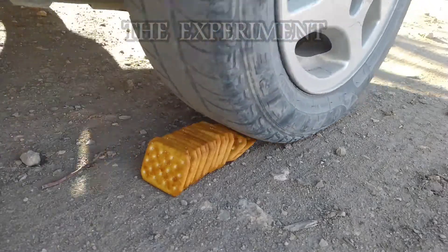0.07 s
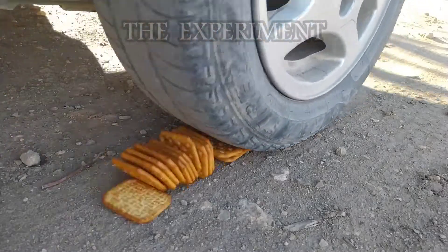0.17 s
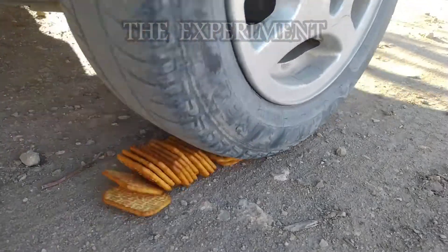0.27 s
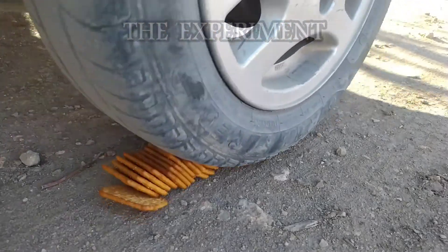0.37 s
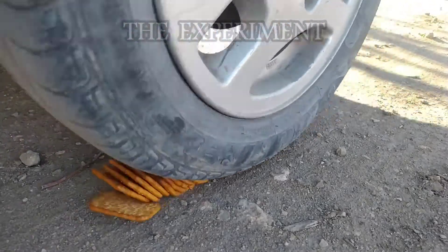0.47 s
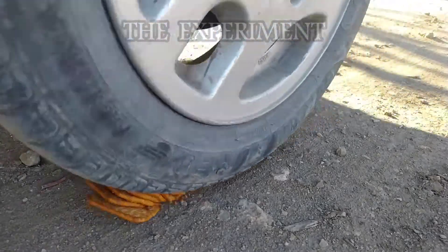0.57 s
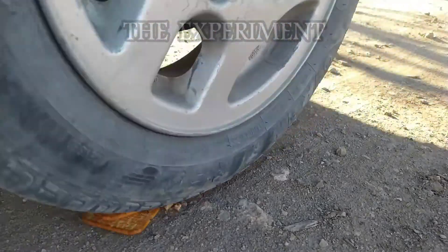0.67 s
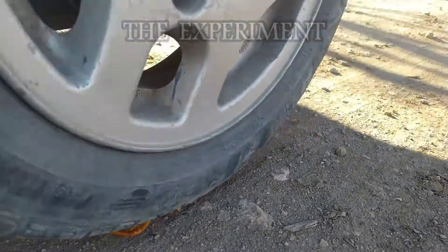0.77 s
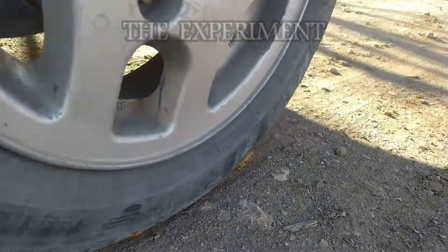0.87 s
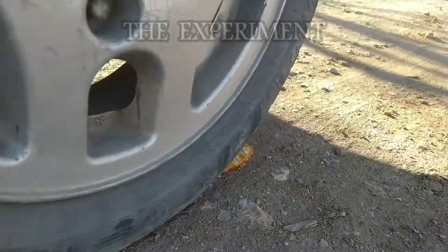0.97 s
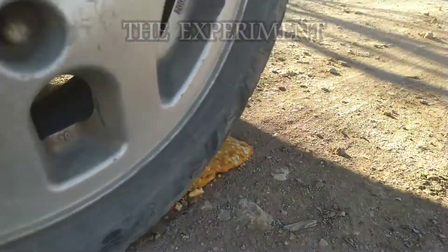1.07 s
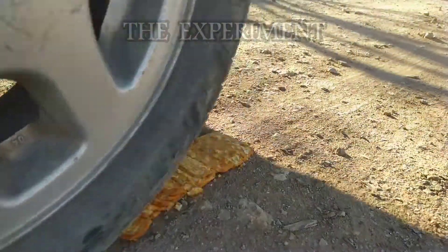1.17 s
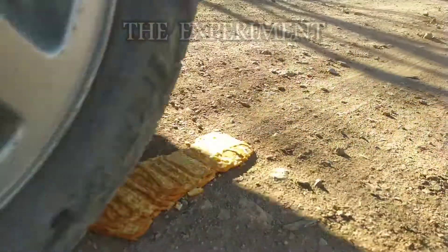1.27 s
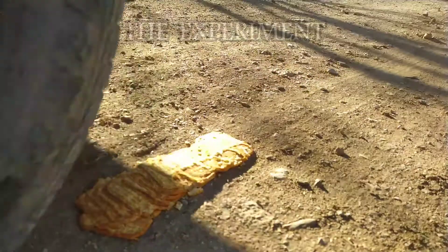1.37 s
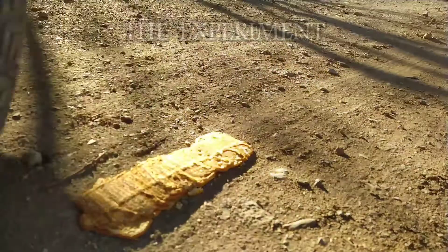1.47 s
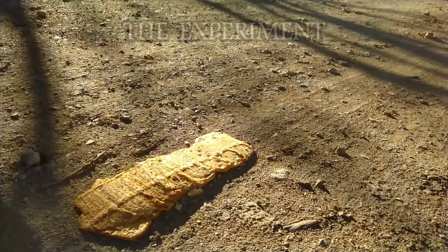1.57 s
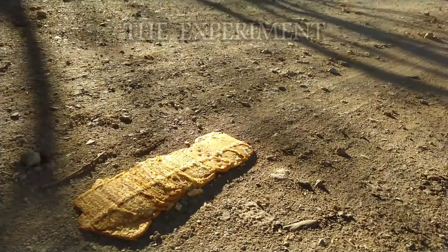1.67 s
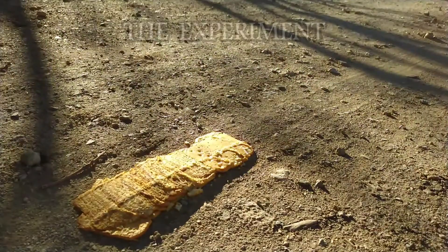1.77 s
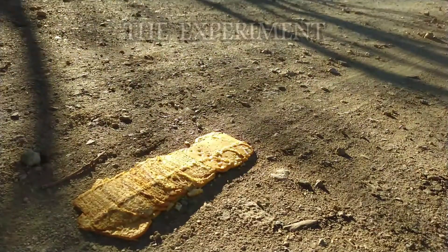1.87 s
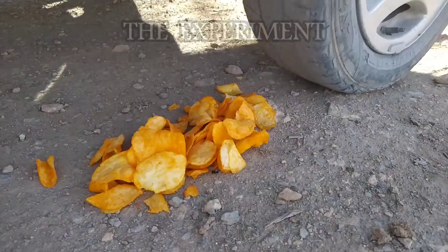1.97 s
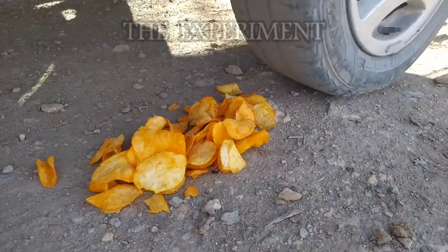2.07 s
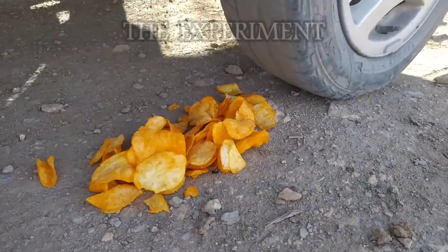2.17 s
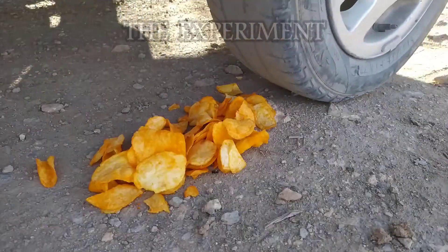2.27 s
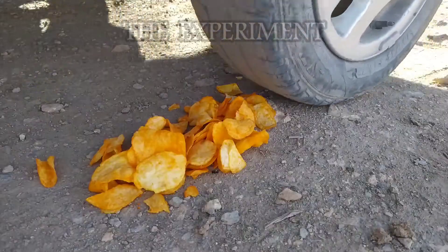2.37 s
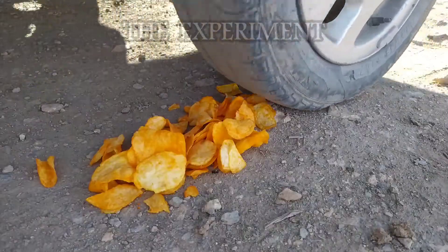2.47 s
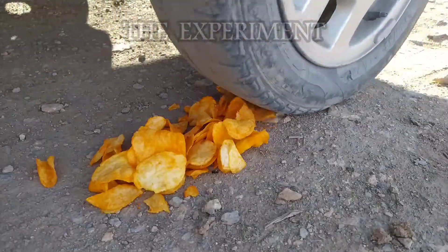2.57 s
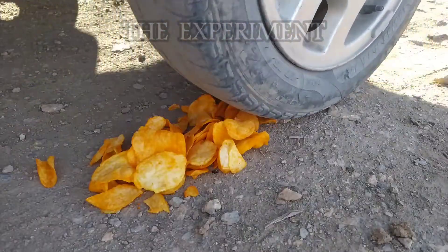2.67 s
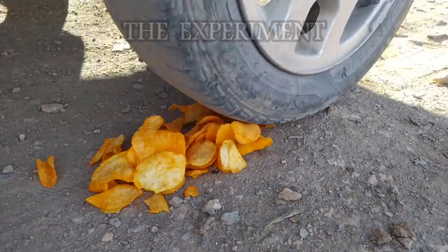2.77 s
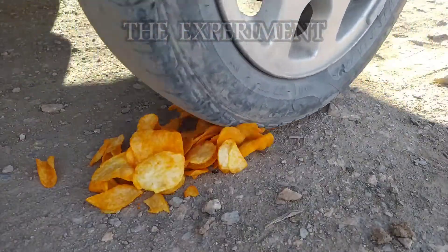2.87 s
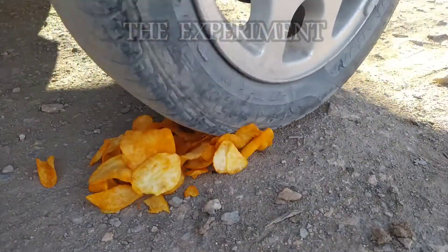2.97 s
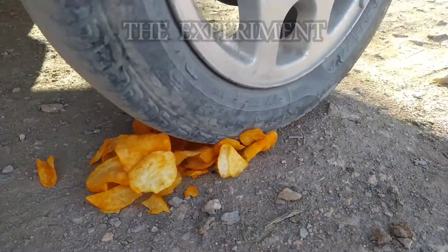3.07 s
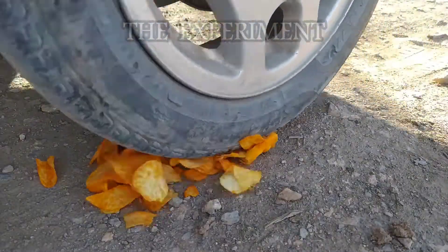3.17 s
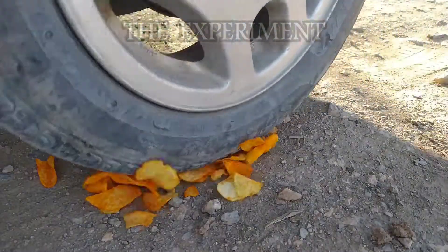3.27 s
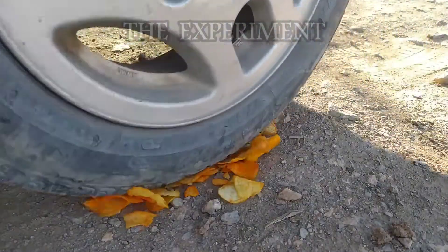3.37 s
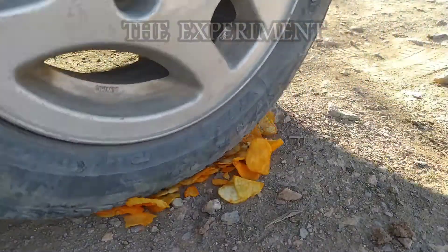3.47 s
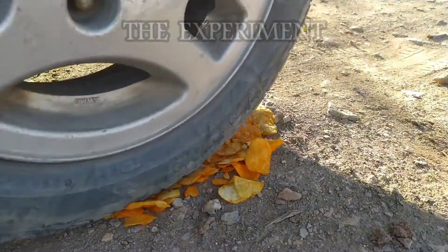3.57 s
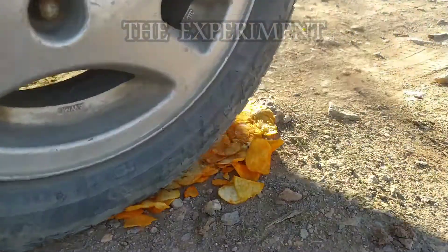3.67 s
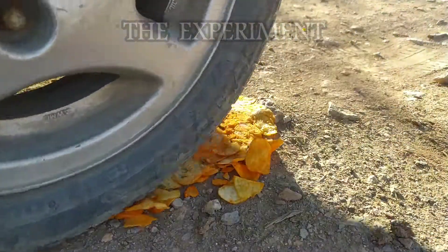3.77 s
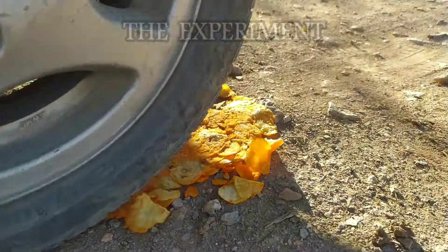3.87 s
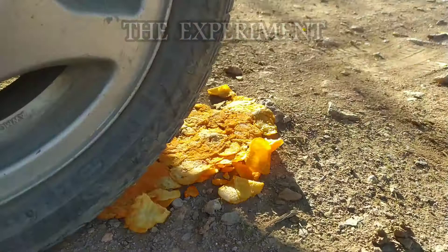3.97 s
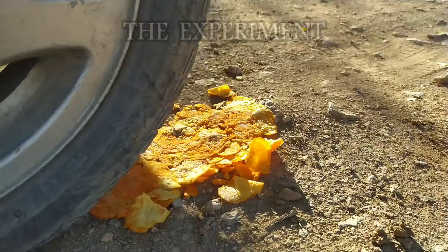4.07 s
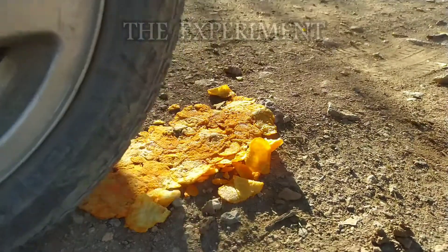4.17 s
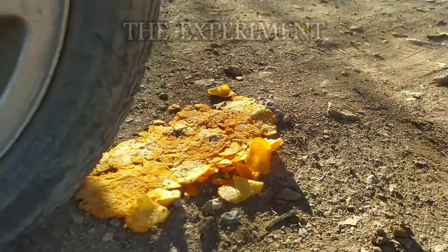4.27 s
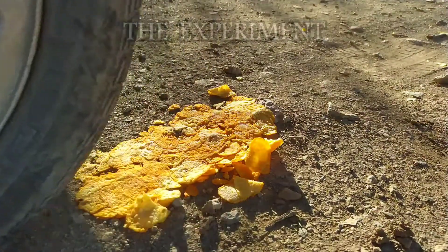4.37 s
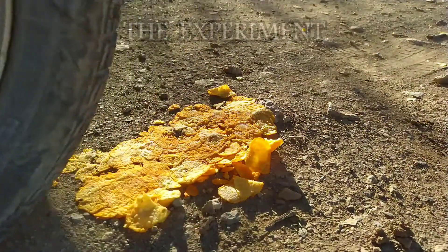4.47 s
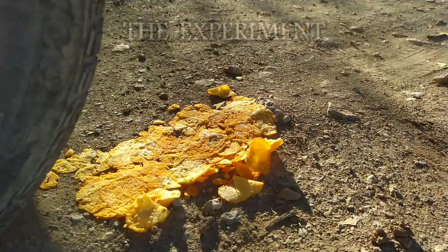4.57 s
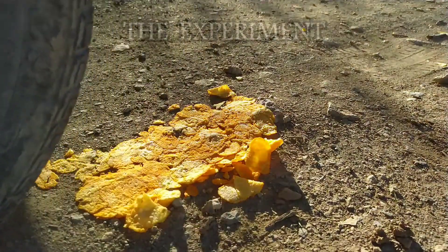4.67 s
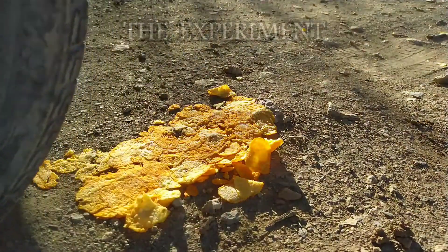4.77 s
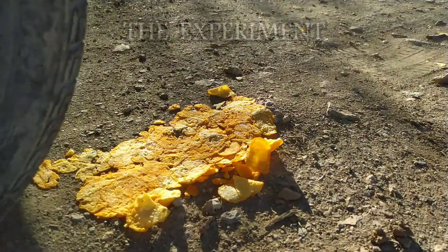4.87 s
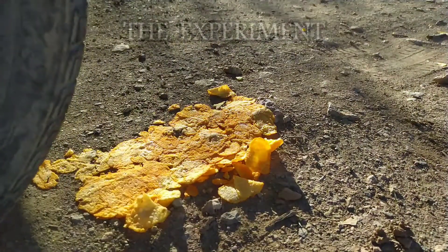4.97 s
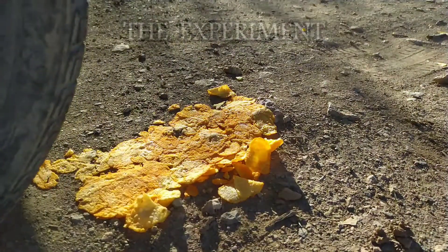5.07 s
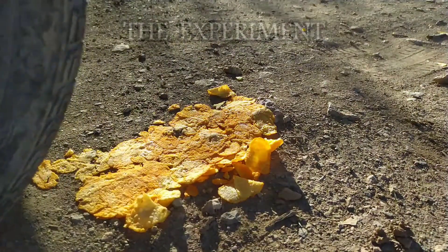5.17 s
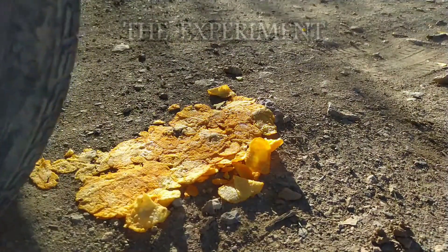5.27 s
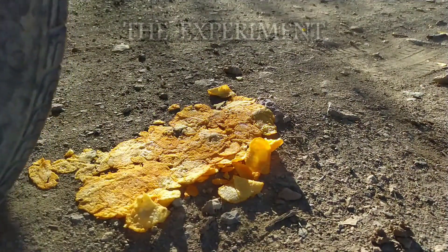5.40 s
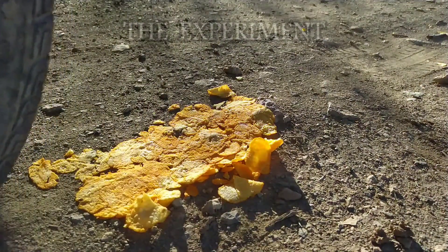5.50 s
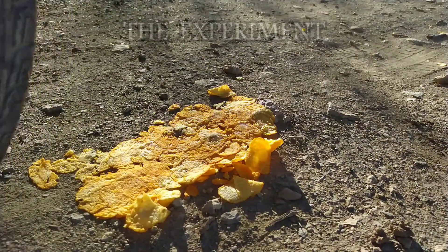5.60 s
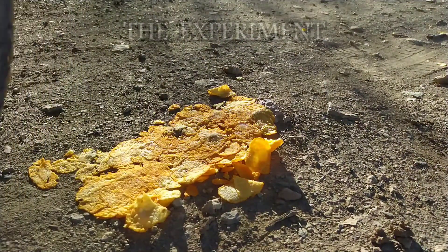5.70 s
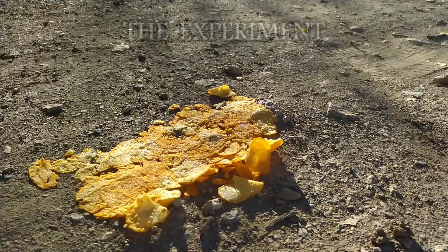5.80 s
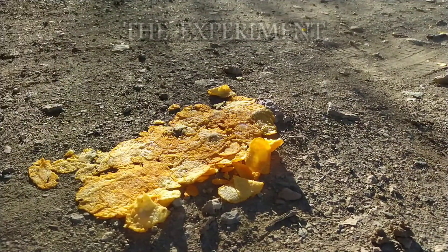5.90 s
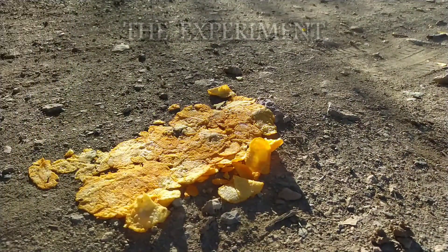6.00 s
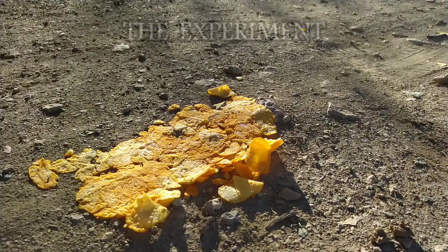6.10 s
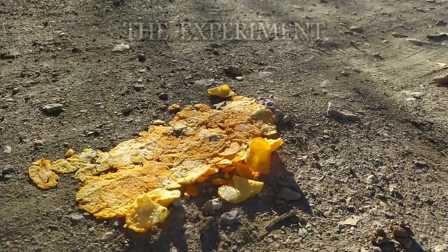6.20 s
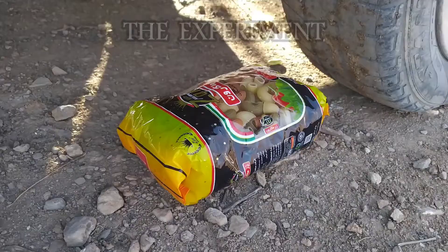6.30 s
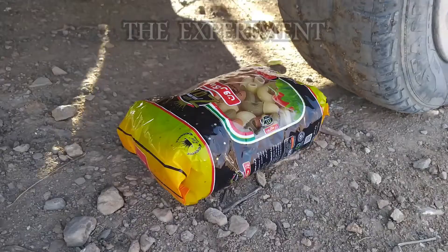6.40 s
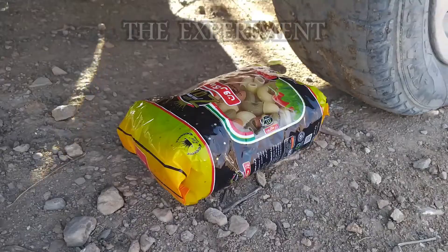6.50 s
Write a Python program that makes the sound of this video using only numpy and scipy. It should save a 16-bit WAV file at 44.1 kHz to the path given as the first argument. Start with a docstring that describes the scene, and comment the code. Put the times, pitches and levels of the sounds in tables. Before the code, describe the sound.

Two close microphones outdoors catch dry snack food crushed by a slow car tyre. First, fine cracker crunching mixes with a low engine dropping in pitch, followed by small knocks and ticks. With the engine abruptly gone, crisps crackle much louder and sharper, swelling then stopping quickly. Quiet air and low hum remain, with scattered grit, a metallic clank with faint distant echoes, a weak sagging squeak and a low thump.

```python
"""A car rolls slowly over snacks on a dirt yard, close to two microphones, in quiet air with a low hum.
First the engine, a harmonic series through exhaust resonances, runs down to idle and ends at 1.87 s.
Meanwhile a tyre grinds crackers, streams of tiny fractures, amid dull knocks and short ticks and pops.
Then, with the car much quieter, grit ticks and a heap of crisps breaks coarsely over a carcass rumble.
Later a steel part clanks and rings in damped modes, a faint squeak sags far off, and a dull thump falls."""
import sys
import numpy as np
from scipy import signal
from scipy.fft import rfft, irfft, next_fast_len
from scipy.io import wavfile
from scipy.ndimage import map_coordinates

SR = 44100
rng = np.random.default_rng(int(sys.argv[2]) if len(sys.argv) > 2 else 0)


def transcribe(signal):
    """Save signal, clipped to [-1, 1], as a 16-bit WAV file at the path in sys.argv[1]."""
    frames = np.atleast_2d(signal).T
    limited = np.clip(frames, -1, 1)
    pcm = np.round(limited * 32767).astype(np.int16)
    wavfile.write(sys.argv[1], SR, pcm)


N = 288392

# Spectra named ..._SPECTRUM have columns: frequency_hz, relative_level_db (per Hz)

# Air of the yard
YARD_SPECTRUM = [(13, -49.5), (22, -9.5), (87, -9.5), (118, -17), (211, -19.5), (278, -21), (398, -25),
                 (457, -26.5), (690, -37.5), (1540, -42), (3230, -55), (10000, -49.5), (16000, -64)]
# Its level: time_s, level_db
YARD_LEVEL = [(1.9, -57), (3.3, -58), (4.2, -60), (5, -65), (6.5, -60)]

# Running down to idle: time_s, firings_per_s
FIRING = [(0, 50.3), (.5, 44.9), (1, 37.2), (1.44, 30.2), (1.71, 27.9), (1.87, 26.8)]
ENGINE_END_S = 1.872
# Exhaust resonances: frequency_hz, harmonic_level_db (before the trims of each order)
EXHAUST = [(25, -43), (29, -38), (34, -33.5), (38, -35.5), (49, -34), (56, -45), (61, -42), (68, -33.5),
           (76, -38), (86, -50), (98, -45), (103, -50), (111, -40), (120, -50), (135, -49), (150, -55),
           (180, -49), (195, -47), (215, -58), (275, -50), (340, -66)]
# Gas rumble and engine-bay whirr
GAS_SPECTRUM = [(12, -14), (30, -2), (65, 0), (90, -5), (115, -4), (160, -8), (220, -8), (400, -20),
                (1200, -60)]
BAY_SPECTRUM = [(20, -14), (94, -7), (160, -5), (210, -2), (275, -2), (436, -2), (700, -8.5), (1000, -4),
                (1550, -12), (2400, -15.5), (3200, -19.5), (5500, -25.5), (7500, -22.5), (10200, -16.5),
                (11600, -28), (13600, -30), (15000, -61)]

# Load of the tyre on each heap: first_bite_s, full_weight_s, last_bite_s, level_db, rise_db_per_s, fall_db_per_s
CRACKER_STACK = (.115, .46, 1.015, -30.1, 28, 14)
CRISP_HEAP = (2.715, 3.35, 3.655, -21.8, 13.3, 34)
# Parts of a heap cave in at once: time_s, gain_db, half_length_s (to 1/e of the gain in dB)
COLLAPSES = [(.2, 7, .038), (.405, 5, .04), (.7, 2, .04), (.78, 2, .03), (1.0, 1.5, .02),
             (2.652, 7.5, .013), (2.775, 2, .018), (3.365, 2.5, .022)]
# The tyre's edge moves from straight ahead to the side: start_s, length_s
PASSES = [(0, 1.15), (2.8, 1.15)]
SIDE_LAG_MS, AHEAD_PAN_DB, SIDE_PAN_DB = .46, 1.0, -1.2  # lag of the left channel; left-right level
# Crunch of crackers and of crisps
CRACKER_SPECTRUM = [(120, -5.5), (200, -5), (275, -2), (330, -7), (430, -10.5), (600, -16), (900, -9),
                    (1400, -10.5), (2200, -12.5), (3100, -21), (4000, -25), (5000, -25), (6500, -22.5),
                    (8300, -15), (10100, -8), (11600, -17), (16000, -28.5)]
CRISP_SPECTRUM = [(70, -20.5), (150, -8), (210, -11), (255, -1), (285, 2), (330, -5.5), (400, -6.5),
                  (600, -9), (860, -2), (1900, -3.5), (2900, -6), (3900, -11), (6000, -10), (8000, -3),
                  (9400, 3), (10500, 1), (11700, -9), (16000, -17.5)]

# Sharp cracks, pieces of food breaking and the hard edge of one knock:
# start_s, relative_crisp_db, relative_body_db, pitch_hz
CRACKS = [(.1258, -30, -36, 1500), (.174, -32, -38, 1200), (.1952, -27, -38, 1400), (.3495, -31, -39, 1700),
          (.429, -28, -36, 1300), (.598, -33, -28, 900), (.6908, -26, -42, 1800), (.904, -32, -41, 1200),
          (.9111, -29, -41, 1900), (.9557, -30, -43, 1500), (.9752, -29, -43, 2100),
          (1.0002, -32, -41, 1400), (2.5546, -41, -48, 1800), (2.6402, -31, -47, 2000),
          (2.6464, -25, -37, 1600), (2.6549, -25, -35, 1400), (2.7033, -27, -36, 1700),
          (2.7756, -17.5, -29, 1900), (2.7891, -22, -36, 2200), (2.8062, -18, -23, 1250),
          (2.8474, -24, -32, 1500), (2.8544, -24, -35, 2100), (2.8803, -31, -29, 900),
          (2.9527, -13.5, -27, 2000), (2.9645, -21, -25, 1200), (3.0138, -22, -29, 1700),
          (3.0195, -17.5, -23.5, 1100), (3.0565, -19, -29, 1500), (3.1014, -19, -30, 1000),
          (3.1507, -19, -30, 1800), (3.2126, -16, -29, 1300), (3.2256, -15, -28, 2000),
          (3.2703, -18, -32, 1600), (3.3371, -17, -30, 1100), (3.3460, -15.5, -29, 1500),
          (3.3645, -16, -29, 1350), (3.4306, -16, -34, 1900), (3.5069, -22, -35, 1400),
          (3.5583, -17, -29, 1700), (3.579, -28, -28, 950), (3.602, -22, -34, 1500),
          (3.6222, -25, -33, 1100), (3.6385, -25, -28, 1000), (3.668, -32, -30, 900),
          (3.6808, -32, -31, 1200), (3.7331, -30, -44, 1800), (3.7552, -39, -47, 800)]
SHARP_CRACK_SPECTRUM = [(150, -14), (400, -7), (900, -2), (1900, -3), (3300, -6), (6000, -5), (9400, 1),
                        (10600, 0), (11800, -7), (16000, -14)]
CASCADE_S = .0016  # length of the quick run within one sharp crack

# Dull knocks with a short ring, the last ones following the thump: start_s, relative_level_db, pitch_hz, t60_s
KNOCKS = [(.597, -20, 335, .07), (1.253, -27.5, 850, .05), (1.44, -35, 213, .12), (1.725, -34, 225, .08),
          (2.088, -42, 480, .04), (2.105, -41, 240, .09), (2.231, -39.5, 342, .06),
          (2.393, -39.5, 347, .08), (2.409, -33, 408, .07), (3.095, -21, 270, .075), (3.625, -33, 700, .06),
          (3.68, -27, 760, .025), (4.138, -37.5, 385, .06), (6.263, -33, 200, .1), (6.333, -43, 250, .05),
          (6.366, -44, 190, .12), (6.476, -42, 234, .11)]
# Modes of a knock: pitch_ratio, relative_level_db
KNOCK_MODES = [(1, 0), (0.87, -2), (1.2, -8), (2.2, -9)]
SCUFF_DB = -7  # gritty scuff under each knock

# Short ticks and pops, pebbles under the tread and clicks around the clank and thump:
# start_s, relative_body_db, relative_crisp_db, pitch_hz
TICKS = [(1.248, -30, -52, 1450), (1.287, -34, -42, 1500), (1.3, -39, -39, 2540), (1.409, -40, -43, 2000),
         (1.431, -38, -51, 1500), (1.897, -36, -39, 1720), (1.977, -51, -61, 1860), (2.093, -44, -54, 1700),
         (2.1, -44, -57, 666), (2.149, -53, -66, 1500), (2.161, -51, -65, 1600), (2.28, -59, -54, 2400),
         (2.392, -43.5, -50, 2260), (2.444, -47, -67, 1430), (2.463, -48, -67, 1800),
         (2.516, -38.5, -42.5, 2180), (3.78, -48, -58, 600), (3.794, -50, -57, 880), (3.87, -56, -55, 870),
         (3.933, -50, -58, 1100), (3.974, -40.5, -49, 1800), (3.986, -48, -52, 1600),
         (4.005, -54, -56, 900), (4.095, -55, -52, 1400), (4.115, -46.5, -44, 860), (4.128, -48, -56, 600),
         (4.141, -48, -60, 900), (4.271, -52, -54, 624), (4.294, -60, -60, 2490), (4.408, -50, -46, 2400),
         (4.531, -58, -57, 1100), (4.723, -49, -70, 934), (5.663, -51.5, -59.5, 1860),
         (5.714, -51, -59, 2400), (5.86, -60, -67, 1800), (5.899, -63, -66, 900), (6.025, -66, -63, 690),
         (6.104, -60, -56, 2700), (6.263, -37, -50, 1150), (6.285, -41, -45, 1600), (6.336, -52, -60, 1700),
         (6.468, -48, -49.5, 2240), (6.496, -53, -54, 1530), (6.531, -51, -59, 1700)]
# Dirt under the creeping tread: time_s, body_level_db (before echoes)
GRIT = [(1.88, -56), (2.06, -65), (2.44, -68), (2.53, -57), (3.78, -56), (3.96, -64), (4.07, -59),
        (4.2, -68), (4.43, -65), (4.8, -81), (5.5, -77), (5.85, -67), (6.25, -77), (6.29, -58), (6.37, -67),
        (6.43, -68), (6.46, -60), (6.54, -60)]
# Colour of the ticks and the dirt
DIRT_SPECTRUM = [(60, -28), (170, -10), (350, 0.5), (600, -2), (900, -1), (2300, -4), (3300, -6.5),
                 (6000, -8.5), (8000, -6.5), (10000, 0), (11500, -11), (16000, -27.5)]

# Rumble of the carcass on the heap: time_s, level_db
CARCASS = [(2.6, -80), (2.85, -57), (3.05, -55), (3.12, -39), (3.35, -42.5), (3.55, -56), (3.68, -57),
           (3.8, -76)]
CARCASS_SPECTRUM = [(20, -8), (45, -4), (80, 4), (130, -6), (210, -3), (275, 1), (340, -6), (430, -7),
                    (600, -24), (1500, -70)]

# The steel part strikes and chatters: start_s, relative_level_db
CLANK = [(4.3833, -17), (4.3868, -26), (4.3905, -27), (4.4005, -39)]
# Modes of the steel: pitch_hz, relative_level_db, t60_s
STEEL = [(273.5, -21.5, .96), (283, -24, .25), (430, -19, .08), (542, -28, .3), (799, -11.5, .17),
         (860, -4, .06), (900, 3.5, .06), (1055, -17, .16), (1180, -1, .06), (1282, -20, .19),
         (1717, -17, .1), (1870, -15.5, .14), (2256, -18, .06), (2406, -20, .11), (2536, -33, .25),
         (2762, -26, .13), (2982, -26, .06), (3385, -32, .19)]
# Colour of the contact noise
CONTACT_SPECTRUM = [(40, -26), (100, -10), (180, -3), (560, -1), (900, 9), (1250, 4), (1900, -3),
                    (2700, -4.5), (3500, -17.5), (5000, -24.5), (9500, -21.5), (12000, -36), (16000, -49)]
# Far walls return the clank: delay_s, relative_level_db, centre_hz, t60_s
ECHOES = [(.15, -34, 1100, .12), (.183, -37, 1500, .1), (.386, -39, 2200, .16)]

# Scuff and shudder of the thump
SCUFF_SPECTRUM = [(40, -20), (90, 0), (200, -10), (430, 0), (800, -14), (1500, -13), (2300, -31), (8000, -50)]
SHUDDER_SPECTRUM = [(30, -25), (85, -6), (175, 0), (290, -4), (600, -16), (2000, -32)]

# The left port is fuller in the bass and duller on top: frequency_hz, left_minus_right_db
PORTS = [(150, 1.5), (300, 3.5), (1000, 2), (3000, -1), (8000, -5), (13000, -3)]
TOP_HZ = 16000  # upper band limit


def amp(db):
    """Level: decibels converted to an amplitude ratio."""
    return 10 ** (np.asarray(db) / 20)


def unit(x):
    """Normalisation: scale to rms 1."""
    return x / np.sqrt(np.mean(x ** 2) + 1e-20)


def clock():
    """Sampling: the time of every sample in seconds."""
    return np.arange(N) / SR


def along(points, hz):
    """Interpolation of (frequency, value) points on a log frequency axis."""
    frequency, value = np.transpose(points)
    return np.interp(np.log(hz + 1), np.log(frequency + 1), value)


def curves(rows):
    """Linear interpolation: one value per sample for each column after the time."""
    s, *columns = np.transpose(rows)
    return [np.interp(clock(), s, column) for column in columns]


def between(start, end, fade=.02):
    """Gating: 1 inside a stretch of time, fading to 0 outside it."""
    inside_s = np.minimum(clock() - start, end - clock())
    return np.clip(inside_s / fade + 1, 0, 1)


def wobble(rate):
    """Slow random modulation: a smooth curve through repeating random knots, rate knots a second."""
    return map_coordinates(rng.standard_normal(400), [clock() * rate], mode="wrap")


def filtered(x, response):
    """Linear filtering: the spectrum of x times a complex frequency response."""
    size = next_fast_len(N + SR // 2)
    hz = np.fft.rfftfreq(size, 1 / SR)
    return irfft(rfft(x, size) * response(hz), size)[..., :N]


def causal(spectrum, size):
    """Minimum phase by the folded cepstrum: log gain (real part) and phase (imaginary part)."""
    level_db = np.maximum(along(spectrum, np.fft.rfftfreq(size, 1 / SR)), -100)
    cepstrum = irfft(np.log(amp(level_db)))
    cepstrum[1:size // 2] *= 2
    cepstrum[size // 2 + 1:] = 0
    return rfft(cepstrum)


def coloured(x, spectrum, size=4096):
    """Causal filtering by a given spectrum, so that attacks stay sharp."""
    impulse_response = irfft(np.exp(causal(spectrum, size)))
    return signal.oaconvolve(x, impulse_response[None], axes=1)[:, :N]


def band(x, kind, split_hz=3300):
    """Band splitting: the crisp treble ("high") or the body ("low") of a sound."""
    return signal.sosfilt(signal.butter(4, split_hz, kind, fs=SR, output="sos"), x)


def placed(x, lag_ms, pan_db):
    """Interchannel time and level difference: a mono sound reaches the right microphone first."""
    lags_ms = np.array([[-lag_ms], [lag_ms]])
    gains = amp([[pan_db / 2], [-pan_db / 2]])
    return gains * filtered(x, lambda hz: np.exp(1j * np.pi * hz * lags_ms / 10 ** 3))


def rush(spectrum, lag_ms, pan_db, diffuse_hz):
    """Coherence falling with frequency: noise comes from one side, its treble from all around."""
    source = placed(rng.standard_normal(N), lag_ms, pan_db)
    direct = filtered(source, lambda hz: diffuse_hz / np.hypot(hz, diffuse_hz))
    around = filtered(rng.standard_normal((2, N)), lambda hz: hz / np.hypot(hz, diffuse_hz))
    return unit(filtered(direct + around, lambda hz: amp(along(spectrum, hz))))


def reverberated(x, wet_db, t60):
    """Diffuse reflection: many short echoes form an exponentially decaying noise tail."""
    t = np.arange(SR // 4) / SR
    tail = rng.standard_normal((2, len(t))) * amp(-60 * t / t60) * (1 - np.exp(-t / .002))
    tail /= np.linalg.norm(tail[0])
    return x + amp(wet_db) * signal.oaconvolve(x, tail, axes=1)[:, :N]


def yard():
    """Background field: broadband outdoor air and the wavering low hum of the car."""
    hum_hz = 84 + 2.5 * wobble(13)
    hum = np.sin(2 * np.pi * np.cumsum(hum_hz) / SR) * amp(-66.5 + 2.0 * wobble(9))
    air = rush(YARD_SPECTRUM, lag_ms=0.33, pan_db=3, diffuse_hz=1500)
    air_db, = curves(YARD_LEVEL)
    return placed(hum, 0.47, 2) + air * amp(air_db)


def engine(size=32768):
    """Source and resonator: firing harmonics slide through exhaust resonances as gas and bay pulse in step."""
    firing_hz, = curves(FIRING)
    turn = 2 * np.pi * np.cumsum(firing_hz) / SR
    shift = causal(EXHAUST, size).imag  # each resonance turns the phase of a harmonic that passes it
    pipe = np.zeros(N)
    for k in np.arange(2, 17) / 2:
        uneven_db = -18 if k % 1 else 0  # unequal cylinders add weak lines halfway
        order_db = uneven_db - 1.1 * max(k - 2, 0) - 5 * max(k - 4, 0)
        level_db = along(EXHAUST, k * firing_hz) + order_db + 1.1 * wobble(9)
        phase = np.interp(k * firing_hz, np.fft.rfftfreq(size, 1 / SR), shift)
        jitter = 0.07 * k * wobble(30)
        pipe += np.sqrt(2) * amp(level_db) * np.cos(k * turn + phase + jitter)
    gas_db = -50 + 3.5 * np.cos(turn)
    gas = rush(GAS_SPECTRUM, lag_ms=.5, pan_db=3, diffuse_hz=3000) * amp(gas_db)
    # the bay quietens as the engine slows
    bay_db = -44.8 + 11.5 * np.log2(firing_hz / 30) + 1.5 * np.cos(turn)
    bay = rush(BAY_SPECTRUM, lag_ms=0.49, pan_db=-1, diffuse_hz=2540) * amp(bay_db)
    sound = placed(pipe, lag_ms=.5, pan_db=3.0) + gas + bay
    return sound * between(0, ENGINE_END_S, fade=0.0043)


def bearing(times):
    """Changing direction: lag (ms) and left-right level (dB) of the tyre's edge as it passes."""
    (first_s, first_length), (second_s, second_length) = PASSES
    first_way = (times - first_s) / first_length
    second_way = (times - second_s) / second_length
    way = np.clip(np.where(times < CRISP_HEAP[0] - .15, first_way, second_way), 0, 1)
    return SIDE_LAG_MS * way, AHEAD_PAN_DB + (SIDE_PAN_DB - AHEAD_PAN_DB) * way


def bursts(times, sizes, t60, low_hz, high_hz, ring, scatter_ms=.06, pan_scatter_db=2, size=400):
    """Impulsive excitation: each event is a tiny burst of noise and ringing near the tyre's edge."""
    t = np.arange(size) / SR
    pitch = low_hz * (high_hz / low_hz) ** rng.random((len(times), 1))
    noise = rng.standard_normal((len(times), size))
    burst = (noise + ring * np.sin(2 * np.pi * pitch * t)) * amp(-60 * t / t60)
    polarity = rng.choice([-1, 1], len(times))
    burst *= (sizes * polarity / np.linalg.norm(burst, axis=1))[:, None]
    lag_ms, pan_db = bearing(times)
    spot = rng.standard_normal((len(times), 2))
    lag_s = (lag_ms + scatter_ms * spot[:, 0]) / 10 ** 3
    pan_db = pan_db + pan_scatter_db * spot[:, 1]
    channels = []
    for side in (1, -1):  # left, right
        first = np.abs(np.round((times + side * lag_s / 2) * SR)).astype(int)
        at = first[:, None] + np.arange(size)
        heard = burst * amp(side * pan_db / 2)[:, None]
        channels.append(np.bincount(at.ravel(), heard.ravel(), N)[:N])
    return np.array(channels)


def stream(start, end, rate, spread_db, count=12000):
    """Random point process: many small events, few large, none above an upper size."""
    draw = rng.random((count, 2))[:int(rate * (end - start))]
    times = start + (end - start) * draw[:, 0]
    return times, amp(-spread_db * np.log(draw[:, 1] + .03))


def crush(start, end, crisp_db, body_db, spectrum, crumb_rate, piece_rate, spread_db, piece_spread_db, ring):
    """Size and pitch: crumbs crackle in the treble, larger pieces crack lower, in uneven clumps."""
    gate = between(start, end)
    crumb_stream = stream(start, end, crumb_rate, spread_db)
    piece_stream = stream(start, end, piece_rate, piece_spread_db)
    crumbs = bursts(*crumb_stream, t60=.004, low_hz=3500, high_hz=14000, ring=ring, size=200)
    pieces = bursts(*piece_stream, t60=.007, low_hz=600, high_hz=3500, ring=ring / 2)
    clumps = amp(.85 * wobble(60))
    crisp = unit(band(coloured(crumbs, spectrum), "high") * clumps) * amp(crisp_db)
    body = unit(band(coloured(pieces, spectrum), "low") * clumps) * amp(body_db)
    # the mean of the gate makes the levels hold within the stretch
    return gate * np.sqrt(gate.mean()) * (crisp + body)


def heap(row, attack_db_per_s, release_db_per_s, body_db, body_follows, dulls_db_per_s):
    """Level follows load: span, treble and body level grow with weight, swell at collapses, then dull."""
    first, full, last, level_db, rise, fall = row
    t = clock()
    load_db = np.minimum(rise * (t - full), fall * (full - t))
    load_db = load_db + sum(db * np.exp(-((t - s) / length) ** 2) for s, db, length in COLLAPSES)
    before_db = attack_db_per_s * np.maximum(first - t, 0)
    after_db = release_db_per_s * np.maximum(t - last, 0)
    contact_db = level_db - before_db - after_db
    body_level_db = contact_db + body_db + body_follows * load_db + dulls_db_per_s * (t - full)
    return first - .065, last + .1, contact_db + load_db, body_level_db


def food():
    """Granular fracture: crackers grind to a fine hiss; crisps break in coarser snaps."""
    stack = heap(CRACKER_STACK, attack_db_per_s=110, release_db_per_s=240,
                 body_db=-4.8, body_follows=.6, dulls_db_per_s=0)
    pile = heap(CRISP_HEAP, attack_db_per_s=140, release_db_per_s=230,
                body_db=-8, body_follows=.72, dulls_db_per_s=1.5)
    crackers = crush(*stack, CRACKER_SPECTRUM, crumb_rate=3800, piece_rate=1300,
                     spread_db=1.7, piece_spread_db=1.7, ring=1.6)
    crisps = crush(*pile, CRISP_SPECTRUM, crumb_rate=3400, piece_rate=1400,
                   spread_db=1.9, piece_spread_db=2, ring=1.5)
    return reverberated(crackers + crisps, wet_db=-10, t60=.05)


def sharp_cracks(count=4):
    """Cascaded impulses: breaking food, and the hard edge of one knock, sound as quick runs of short rings."""
    s, crisp_db, body_db, hz = np.repeat(CRACKS, count, axis=0).T
    draw = rng.random((len(s), 2))
    s = s + CASCADE_S * (np.arange(len(s)) % count + draw[:, 0]) / count
    share = (.5 + draw[:, 1]) / np.sqrt(count)
    crisp = bursts(s, share * amp(crisp_db + 21.5), t60=.006, low_hz=6500, high_hz=11000,
                   ring=1.3, pan_scatter_db=1.5)
    body = bursts(s, share * amp(body_db + 25.5), t60=.013, low_hz=.8 * hz[:, None],
                  high_hz=1.25 * hz[:, None], ring=.7, size=800)
    treble = band(coloured(crisp, SHARP_CRACK_SPECTRUM), "high")
    low = band(coloured(body, SHARP_CRACK_SPECTRUM), "low")
    return reverberated(treble + low, wet_db=-11, t60=.04)


def knocks():
    """Damped modes: each dull knock is a short ring of a few partials with a gritty scuff."""
    out, t = np.zeros(N + SR), np.arange(SR // 3) / SR
    for s, db, hz, t60 in KNOCKS:
        ring = sum(amp(level) * np.sin(2 * np.pi * hz * ratio * t) for ratio, level in KNOCK_MODES)
        scuff_band = signal.butter(2, [1.4 * hz, 3.2 * hz], "band", fs=SR, output="sos")
        scuff = unit(signal.sosfilt(scuff_band, rng.standard_normal(len(t))))
        envelope = amp(db - 60 * t / t60) * (1 - np.exp(-t / 0.0024))
        out[round(s * SR):][:len(t)] += envelope * (ring + amp(SCUFF_DB) * scuff)
    return reverberated(placed(out[:N], 0.47, .5), wet_db=-8.5, t60=0.21)


def ticks():
    """Impulse and reflection: short ticks and pops, each with a pitch of its own, leave brief echoes."""
    s, body_db, crisp_db, hz = np.transpose(TICKS)
    crisp = bursts(s, amp(crisp_db + 30.5), t60=.0075, low_hz=5300, high_hz=9800, ring=0.34)
    body = bursts(s, amp(body_db + 31.5), t60=0.013, low_hz=hz[:, None], high_hz=hz[:, None], ring=0.4)
    treble = reverberated(band(coloured(crisp, DIRT_SPECTRUM), "high"), wet_db=-4, t60=.065)
    return treble + reverberated(band(coloured(body, DIRT_SPECTRUM), "low"), wet_db=-1.5, t60=0.075)


def dirt():
    """Granular contact: sand and small stones tick under the tread and echo under the car."""
    level_db, = curves(GRIT)
    treble_db = -7  # relative to the body
    grit = crush(GRIT[0][0], GRIT[-1][0], level_db + treble_db, level_db, DIRT_SPECTRUM,
                 crumb_rate=380, piece_rate=400, spread_db=2.6, piece_spread_db=2.2, ring=.9)
    return reverberated(grit, wet_db=0.5, t60=0.078)


def carcass():
    """Shell resonance as shaped noise: the loaded tyre drums softly as it climbs the heap."""
    level_db, = curves(CARCASS)
    return rush(CARCASS_SPECTRUM, lag_ms=.2, pan_db=-1.5, diffuse_hz=800) * amp(level_db)


def clank():
    """Modal impact: steel strikes steel with a chattering crack, quick high modes and a long low ring."""
    ring, crack, t = np.zeros(N + SR), np.zeros(N + SR), np.arange(SR) / SR
    s, db = CLANK[0]
    for k, (hz, level, t60) in enumerate(STEEL):
        envelope = amp(db + level - 60 * t / t60) * (1 - np.exp(-t / .0012))
        ring[round(s * SR):][:SR] += (-1) ** k * envelope * np.sin(2 * np.pi * hz * t)
    for s, db in CLANK:
        # a sharp contact, then loose parts rustle briefly
        crack[round(s * SR)] += amp(db + 25.5)
        rustle = amp(db + 7.5 - 60 * t / .008) + amp(db - 8.5 - 60 * t / .1)
        crack[round(s * SR):][:SR] += rustle * rng.standard_normal(SR)
    blow = coloured(placed(crack[:N], lag_ms=.45, pan_db=-3), CONTACT_SPECTRUM)
    return placed(ring[:N], lag_ms=0.41, pan_db=1.0) + reverberated(blow, wet_db=-10, t60=0.075)


def echoed(x):
    """Delayed reflection: x and its dull, smeared returns from far walls."""
    out = x
    for delay, db, centre_hz, t60 in ECHOES:
        far = filtered(x, lambda hz: amp(db) * np.exp(-2j * np.pi * hz * delay
                                                      - np.log2((hz + 1) / centre_hz) ** 2))
        out = out + reverberated(amp(-6) * far, wet_db=8, t60=t60)
    return out


def squeak(start=5.414, level_db=-43.5, pitch_hz=900, sag_hz_per_s=400, attack_s=.005, t60=.23, rough=.13):
    """Frequency modulation: one faint far squeak, roughened at random, sags as it fades."""
    t = np.maximum(clock() - start, 0)
    hz = (pitch_hz - sag_hz_per_s * t) * (1 + rough * wobble(250))
    envelope = amp(level_db - 60 * t / t60) * (1 - np.exp(-t / attack_s))
    tone = np.sin(2 * np.pi * np.cumsum(hz) / SR) * envelope
    return reverberated(placed(tone, lag_ms=.47, pan_db=.5), wet_db=-8, t60=.2)


def thump(start=6.286, level_db=-23.5, first_hz=300, last_hz=145, sag_s=.013, swell_s=.01,
          tail_db=-41, tail_t60=.36, panel_hz=1570, panel_db=-46, panel_t60=.1):
    """Falling pitch under a soft swell: a heavy thump, a thin faint ring and a dying low shudder."""
    t = np.maximum(clock() - start, 0)
    hz = (last_hz + (first_hz - last_hz) * np.exp(-t / sag_s)) * (t > 0)
    turn = 2 * np.pi * np.cumsum(hz) / SR
    push = (t / swell_s * np.exp(1 - t / swell_s)) ** 2
    scuff = unit(filtered(rng.standard_normal(N), lambda hz: amp(along(SCUFF_SPECTRUM, hz))))
    shudder = unit(filtered(rng.standard_normal(N), lambda hz: amp(along(SHUDDER_SPECTRUM, hz))))
    body = amp(level_db) * push * (np.sin(turn) + amp(-10) * np.sin(2 * turn) + amp(-8.5) * scuff)
    panel = amp(panel_db - 60 * t / panel_t60) * np.sin(2 * np.pi * panel_hz * t)
    tail = (amp(tail_db - 60 * t / tail_t60) * shudder + panel) * (1 - np.exp(-t / swell_s))
    return placed(body + tail, lag_ms=.47, pan_db=.5)


def scene():
    """Superposition: the sum of everything that reaches the microphones."""
    rolling = yard() + engine() + food() + sharp_cracks() + knocks() + ticks() + dirt() + carcass()
    return rolling + echoed(clank()) + squeak() + thump()


def record(dry):
    """Receiver response: the two ports differ in colour and pass nothing far above the band limit."""
    halves = np.array([[.5], [-.5]])
    ported = filtered(dry, lambda hz: amp(along(PORTS, hz) * halves))
    return filtered(ported, lambda hz: np.clip((TOP_HZ - hz) / 500 + .5, 0, 1))


dry = scene()
out = record(dry)
transcribe(out)
```